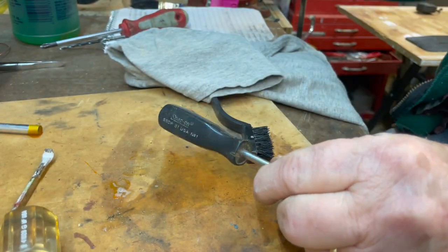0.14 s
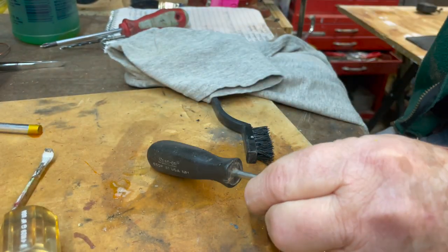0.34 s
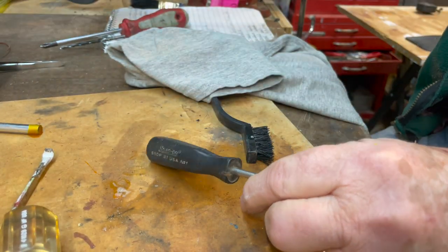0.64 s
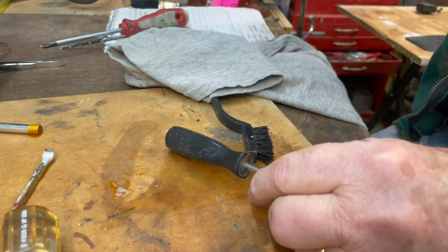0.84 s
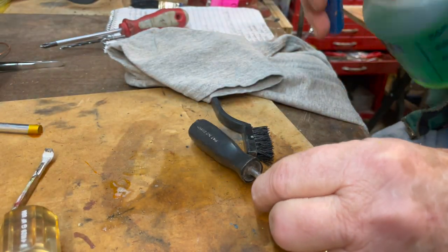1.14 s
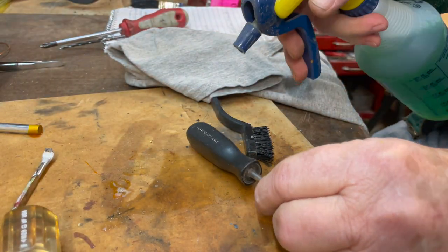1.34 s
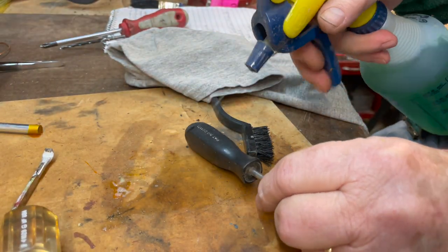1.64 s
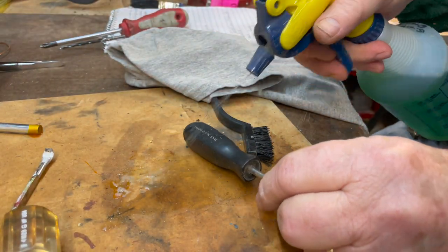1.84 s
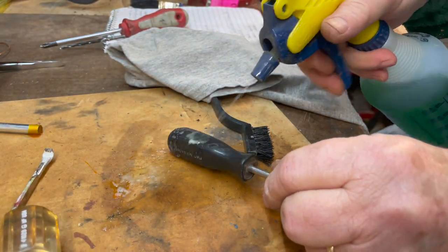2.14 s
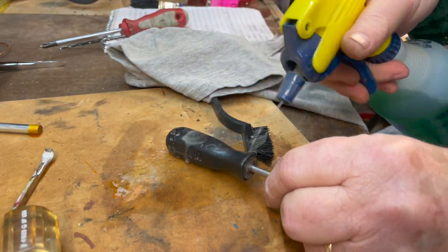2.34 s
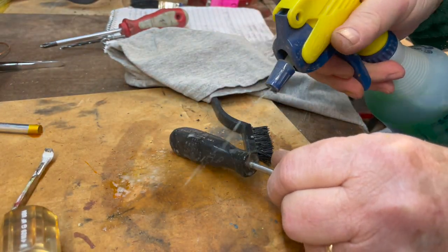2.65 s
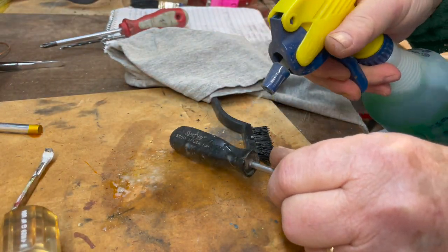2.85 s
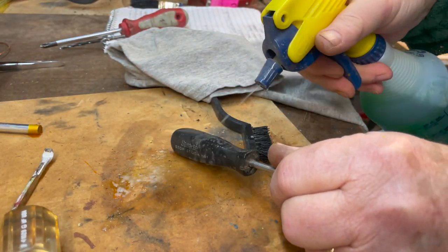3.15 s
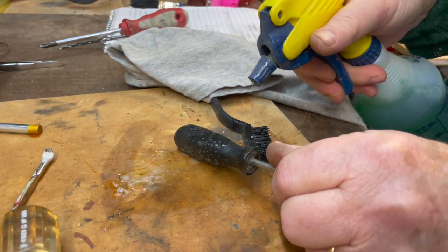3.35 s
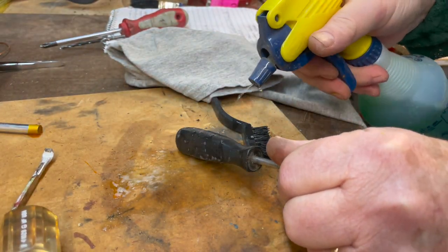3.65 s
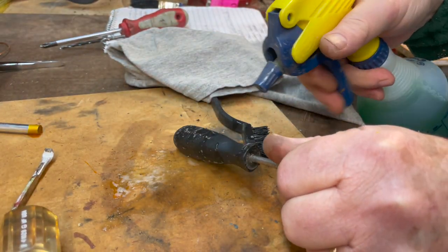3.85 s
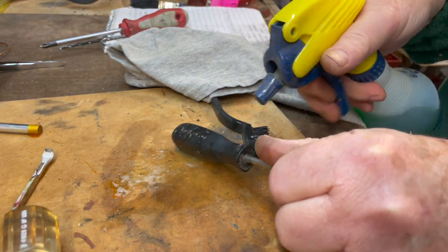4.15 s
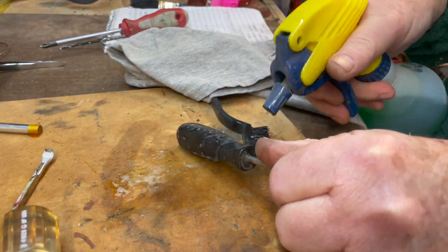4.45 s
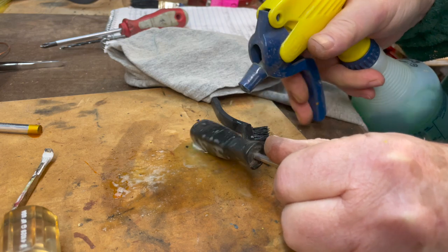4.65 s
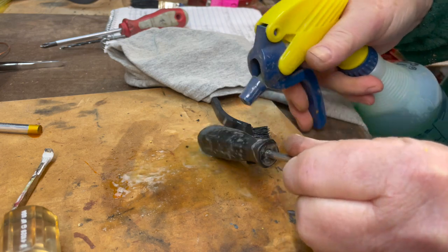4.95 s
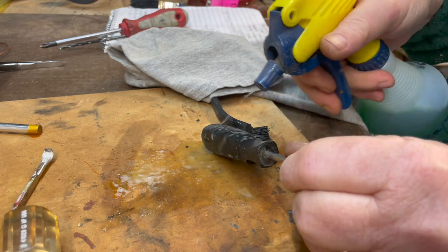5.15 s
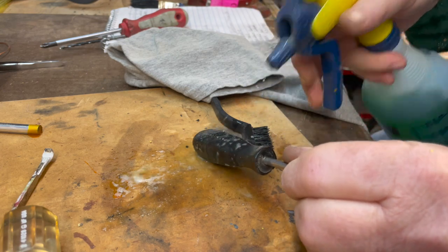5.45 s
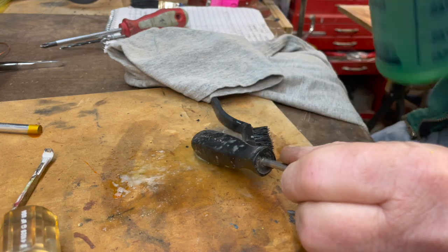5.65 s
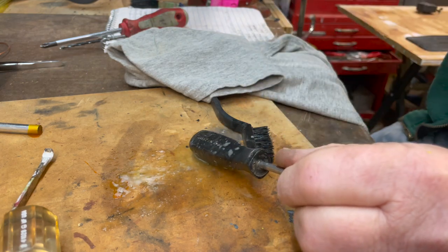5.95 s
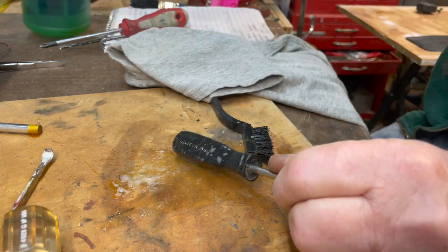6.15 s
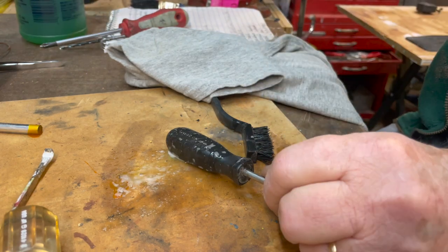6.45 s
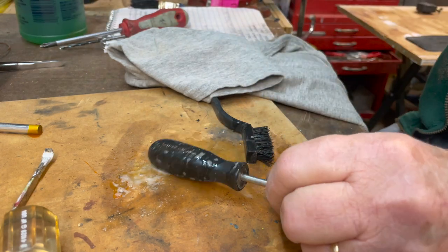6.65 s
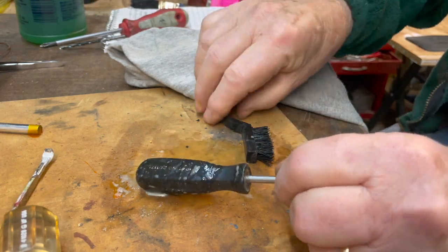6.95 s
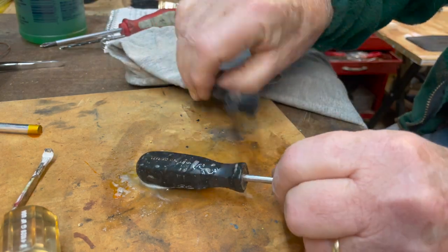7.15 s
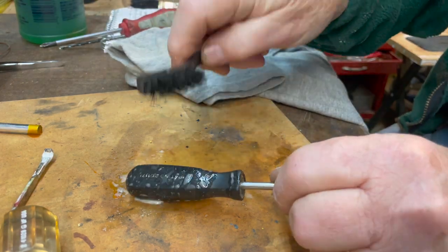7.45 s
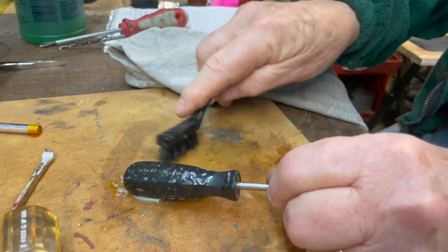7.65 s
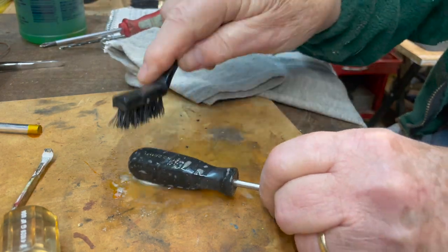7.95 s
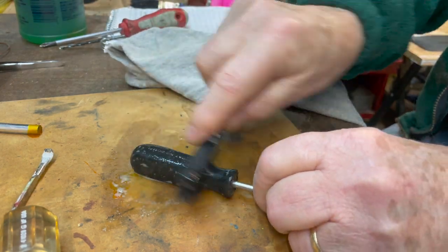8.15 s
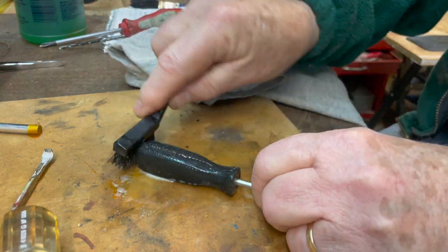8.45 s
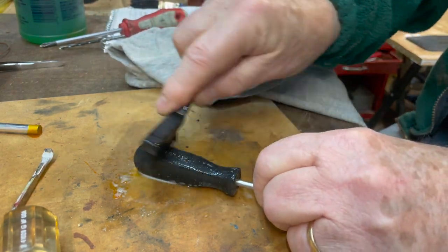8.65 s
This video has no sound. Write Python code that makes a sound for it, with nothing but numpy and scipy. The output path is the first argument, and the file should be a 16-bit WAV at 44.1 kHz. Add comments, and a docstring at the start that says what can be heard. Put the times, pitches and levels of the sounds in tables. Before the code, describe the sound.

Close up in a small workshop with a low fan hum, a tool handle knocks sharply on a wooden board. A plastic sprayer clacks, then gives about sixteen short, fine hissing squirts with light trigger clicks. The bottle is set down with a hollow, rocking thud. Cloth and hands rustle, then a stiff brush scratches the wet handle in quick strokes, with one hard rap. Near stereo phone microphone, short room ring.

```python
"""A trigger bottle sprays close to a phone: shaped noise for the hissing jet, lower noise for the splash.
It is on a workshop bench, where a stiff brush later scrubs a wet tool handle in bursts of grainy noise.
Knocks on the board, the trigger, the bottle set down and brush raps are fading sine waves plus short noise.
Small snaps, scuffs and rustling are noise too. A fan motor hums in steady tones under rushing air.
The small room rings briefly after the hits."""
import sys
import numpy as np
from scipy import signal
from scipy.fft import rfft, irfft
from scipy.io import wavfile

SR = 44100
rng = np.random.default_rng(int(sys.argv[2]) if len(sys.argv) > 2 else 0)


def transcribe(u):
    """Save the signal u as a 16-bit wav file named by the first command-line argument.

    u: samples, shape (n,) or (channels, n), limited to [-1, 1]; the rate is SR.
    q: integer samples, one column per channel.
    """
    v = np.clip(np.atleast_2d(u).T, -1, 1)
    q = np.round(v * 32767).astype(np.int16)
    wavfile.write(sys.argv[1], SR, q)


N = 388521
T = np.arange(N) / SR  # seconds
HZ = np.maximum(np.arange(N // 2 + 1) * SR / N, 1)  # pitch of each spectrum bin

# Fan motor tones: [pitch_hz, rms_level_db]
MOTOR_TONES = [(56.5, -45), (59.6, -64), (85.3, -62.5)]
# Tone colour of the fan's air: [pitch_hz, relative_level_db_per_hz]
AIR_COLOUR = [(25, -17), (45, -12), (60, 3), (75, -0.5), (95, -9), (130, -14.5), (170, -5.5), (240, -11),
              (295, -2), (340, 4.5), (385, -10.5), (480, -8), (700, -14), (1200, -15), (2000, -22),
              (2700, -27), (3280, -27.5), (3600, -31.5), (5500, -41), (8500, -53.5), (13300, -46),
              (15500, -69)]
# Ringing of the small room by pitch: [pitch_hz, t60_s (time to fade by 60 dB), level_db]
ROOM_BANDS = [(215, 0.29, -3), (844, 0.24, -9), (3040, 0.15, -7), (9600, 0.097, -5.5)]
# The phone's two microphone ports: [pitch_hz, likeness_0_to_1, right_leads_rad, left_minus_right_db]
MICROPHONE_PORTS = [(62, 1, 0, 0), (125, 0.8, -.3, 0), (247, 0.8, -0.53, 1.5), (632, 0.64, -1.27, 0.5),
                    (924, 0, -2.5, -0.5), (1170, 0.39, -2, 2.5), (2110, 0.33, -1.5, 1.5),
                    (3260, 0.33, -2, 2), (5010, 0.23, -6, 2.5), (5550, 1, -3, 3), (6630, 0.06, 0, 0.5),
                    (7900, 0, -2.5, 3), (9120, 1, -3, -1), (11300, 0.66, -1.7, 1), (13100, 1, 0, 0)]

# Sleeves and hands moving: [peak_s, rise_s, fall_s, hiss_level_db, rub_level_db]
HAND_RUSTLES = [(0.01, .05, 0.13, -73, -76), (0.225, .03, 0.13, -69, -78), (0.42, 0.16, 0.14, -66, -61.5),
                (0.62, .12, .12, -82, -81), (0.88, 0.16, 0.19, -73, -70.5), (1.02, 0.15, 0.15, -74, -68),
                (1.24, 0.2, 0.13, -67.5, -66.5), (5.89, 0.043, 0.043, -70, -88),
                (6.23, 0.053, 0.1, -58, -55), (6.5, 0.51, 0.48, -68, -69), (6.69, 0.12, 0.065, -64, -54),
                (7.21, 0.17, 0.13, -61, -61.5), (7.36, 0.077, 0.064, -62.5, -55.5),
                (7.51, 0.083, 0.072, -70, -68), (7.96, 0.18, 0.068, -68.5, -66)]
# Colour of the thin rustling hiss: [pitch_hz, level_db]
RUSTLE_HISS_COLOUR = [(8000, -27), (9500, 12), (11000, 11), (13300, 11), (15000, 7.5), (16000, -20)]
# The handle turned softly against the board: [peak_s, rise_s, fall_s, level_db]
HANDLE_NUDGES = [(.785, .015, 0.034, -52), (1.5, .015, .04, -49), (4.7, 0.018, 0.037, -53.5),
                 (7.75, 0.064, 0.043, -50), (2.56, 0.039, .06, -51.5), (2.63, .04, 0.086, -54),
                 (3.215, 0.019, 0.021, -46), (3.45, .02, .03, -51), (4.345, 0.017, 0.017, -50),
                 (4.93, 0.026, .04, -48.5), (5.1, 0.022, 0.047, -50)]
# Dull colour of those scuffs: [pitch_hz, level_db]
DULL_SCUFF_COLOUR = [(300, -32), (450, -3.5), (540, 8.5), (640, -3), (850, -2), (1300, -9), (1800, -13),
                     (2600, -40)]
# Thin bright snaps: [start_s, bright_peak_db, lower_part_relative_db]
BRIGHT_SNAPS = [(0.221, -55, -0.5), (0.763, -35.5, 0), (0.963, -50, 3), (1.477, -13.5, -10),
                (2.2677, -28, -9), (3.736, -42.5, -3), (3.854, -32, -1), (4.138, -24.5, -9.5),
                (4.7143, -27, -6.5), (5.024, -29.5, -7), (5.454, -46.5, -2), (5.474, -37, -18.5),
                (5.5728, -30.5, -19), (6.197, -30.5, 2), (6.6664, -58, -3), (6.9737, -46, 4),
                (7.613, -41.5, 9.5), (7.629, -53, -1), (7.6486, -45, 12)]

# In the tables of blows, levels are before panning; hardness tilts the ring about 1000 Hz.
# Knocks on the board: [start_s, ring_peak_db, crack_level_db, left_minus_right_db, hardness_db_per_octave]
BOARD_KNOCKS = [(0.3218, -5, -30, 4.5, 4.5), (0.364, -23.5, -63, 2, 0), (0.777, -37.5, -87, 8, -4.5),
                (1.013, -17.5, -51, 2, 2), (6.632, -38, -48, 5, -7.5), (6.667, -36, -60, 1, -4),
                (6.699, -38, -48, 2, -4), (7.011, -33, -53, 4, -6), (7.123, -39, -64, 0, -8),
                (7.186, -34, -51, 4, 4), (7.68, -37, -59, 19, 4), (8.649, -40, -68, 7, -12.5)]
# Resonances of the board: [pitch_hz, level_db, t60_s]
BOARD_MODES = [(164, -24.5, 0.035), (300, -26, 0.035), (520.5, 0, 0.13), (610, -7, 0.069),
               (720, -5.5, 0.12), (894, -5.5, 0.065), (1031, 4, 0.053), (1190, 7, 0.072), (1360, 5, 0.04),
               (1544, -1, 0.022), (2140, -18, 0.029), (2310, -14, 0.03), (2900, -10.5, 0.043),
               (3600, -14, 0.025)]
# The bottle set down, rocking on its base: [start_s, ring_peak_db, hardness_db_per_octave]
BOTTLE_THUDS = [(6.193, -18, -2), (6.198, -17, -3), (6.205, -14, -0.5), (6.214, -14, -1), (6.225, -24, -3),
                (6.232, -29, -12), (6.239, -25, 8), (6.246, -23, 0), (6.249, -24.5, 3), (6.255, -21.5, 1),
                (6.262, -23.5, -2), (6.271, -22, -5), (6.284, -35, 2), (6.291, -30, -1), (6.301, -33, -1),
                (6.313, -31.5, -2)]
# Resonances of the bottle: [pitch_hz, level_db, t60_s]
BOTTLE_MODES = [(102, -14.5, 0.12), (163, 0, 0.067), (242, 1, 0.044), (432, 9.5, 0.018), (635, 0, 0.09),
                (893, 6, 0.047), (1020, 1.5, 0.17), (1227, 0.5, 0.21), (1647, -1.5, 0.09),
                (1985, -5, 0.059), (2600, -17, 0.036), (3250, -7, 0.03)]
# The brush back raps the handle: [start_s, ring_peak_db, crack_level_db, left_minus_right_db,
# hardness_db_per_octave]
BRUSH_RAPS = [(8.034, -30, -51.5, 4, -8), (8.042, -31, -58, 7, -11), (8.381, -47, -59, -3, -2),
              (8.4685, -8.5, -32.5, 1.5, 1.5), (8.4755, -23.5, -45, 5, -7)]
# Resonances of the handle: [pitch_hz, level_db, t60_s]
HANDLE_MODES = [(552, -6, 0.057), (770, -5.5, 0.066), (1214, 2, 0.069), (1524, 3.5, 0.037),
                (2100, -4, .022), (2320, 3, 0.02), (2730, -4, 0.019), (3470, -3, 0.022), (4160, -19, 0.017),
                (4850, -6, 0.017)]

# Brush strokes: [peak_s, rise_s, fall_s, bristle_level_db, drag_level_db]
BRUSH_STROKES = [(7.005, 0.043, 0.048, -53, -56), (7.73, 0.093, 0.09, -40.5, -48.5),
                 (8.07, 0.043, 0.063, -46, -55.5), (8.2, 0.065, 0.087, -47, -56.5),
                 (8.3, 0.064, 0.061, -43, -56), (8.42, 0.066, 0.072, -44, -58.5),
                 (8.53, 0.049, 0.067, -42.5, -61), (8.65, 0.076, 0.054, -48.5, -63),
                 (8.75, 0.059, 0.056, -46, -61)]
# Bright colour of the bristle tips: [pitch_hz, level_db]
BRISTLE_COLOUR = [(8000, -17.5), (9500, -4.5), (11000, -6), (12300, -6), (13600, -2.5), (15600, -9.5),
                  (16200, -50)]
# Fuller colour of sliding, for the brush's drag and for rubbing hands: [pitch_hz, level_db]
DRAG_COLOUR = [(300, 9.5), (700, 10), (1500, 3.5), (2500, 0), (3500, -3), (4500, -2), (5500, 2.5),
               (7000, -2), (9000, -14.5), (10500, -36)]
# Low colour of the handle rocking on the board: [pitch_hz, level_db]
ROCKING_COLOUR = [(60, -20), (110, 14), (180, 4), (300, -16), (550, 4), (900, -40), (1500, -50)]
# Tufts of bristles flicking free: [start_s, bright_peak_db]
TUFT_FLICKS = [(8.034, -31), (8.053, -36), (8.0747, -38), (8.096, -33), (8.1834, -33), (8.225, -35),
               (8.2344, -37), (8.2382, -38), (8.2666, -25), (8.309, -30), (8.3215, -39), (8.382, -31),
               (8.4, -35), (8.44, -35), (8.455, -29), (8.505, -28), (8.512, -29), (8.528, -33),
               (8.542, -31), (8.565, -37), (8.574, -37), (8.587, -34), (8.6108, -40), (8.639, -39),
               (8.666, -31.5), (8.681, -34), (8.693, -42), (8.708, -32), (8.728, -32)]

# The trigger meets its stops: [start_s, ring_peak_db, crack_level_db]
TRIGGER_STOPS = [(1.6047, -46, -43.5), (1.7335, -41, -55.5), (1.855, -38.5, -41.5), (2.123, -38, -47.5),
                 (2.2523, -41.5, -53.5), (2.387, -40, -52.5), (2.5296, -39, -53), (2.6596, -38.5, -52.5),
                 (2.9125, -40, -71.5), (3.176, -41, -51.5), (3.4246, -38.5, -68.5), (3.713, -40, -74),
                 (3.975, -43, -51.5), (4.256, -42, -50), (4.3844, -48, -56), (4.547, -43, -45.5),
                 (4.6876, -35.5, -48), (4.861, -36.5, -46.5), (5.1332, -42, -51), (5.3695, -40, -47),
                 (5.475, -37, -40), (5.5727, -43.5, -50.5)]
# Resonances of the trigger lever: [pitch_hz, level_db, t60_s]
LEVER_MODES = [(580, -15, 0.023), (1376, -10, 0.18), (1750, -2.5, .06), (2046, 2.5, 0.13), (2430, -5, .06),
               (2960, -7, 0.1), (4070, -2, 0.048), (4820, -14, 0.017)]
# The plastic housing clacks at the first pull, then ticks faintly: [start_s, ring_peak_db,
# crack_level_db, left_minus_right_db, hardness_db_per_octave]
HOUSING_CLACKS = [(1.4792, -8.5, -30.5, -1, 0.5), (3.365, -50, -60, -2, -2), (3.539, -38, -57, 2, -6),
                  (3.572, -39, -56, -2, -8), (3.597, -45, -53, -2, 0), (3.858, -51, -62, -2, -4),
                  (4.143, -45, -55, -4, -9), (4.268, -45, -56, -2, 5), (4.566, -45, -54, -2, 7)]
# Resonances of the housing: [pitch_hz, level_db, t60_s]
HOUSING_MODES = [(550, -8.5, 0.07), (1103, -3.5, 0.022), (2040, -11, 0.02), (2470, -15, 0.018),
                 (3200, 2, 0.012), (3530, 7.5, 0.012), (3930, 5.5, 0.025), (4900, -6, 0.018),
                 (6000, -4, .012), (6600, -6, 0.012)]
# Squirts, one per pull of the trigger: [peak_s, rise_s, fall_s, jet_level_db, splash_level_db]
SQUIRTS = [(1.61, 0.32, 0.15, -55.5, -68), (1.83, 0.15, 0.19, -46, -69), (2.1, 0.16, 0.21, -51, -65.5),
           (2.33, 0.12, 0.29, -55, -65.5), (2.64, 0.21, 0.2, -56, -63.5), (2.9, 0.21, 0.16, -55, -66.5),
           (3.16, 0.18, 0.15, -55.5, -66.5), (3.41, 0.14, 0.23, -65, -61.5),
           (3.67, 0.2, 0.38, -66.5, -66.5), (3.93, 0.16, 0.37, -62.5, -69), (4.24, 0.17, 0.17, -57, -78),
           (4.5, 0.18, 0.49, -67, -64), (4.88, 0.24, 0.23, -63, -65), (5.11, 0.1, 0.19, -68, -77),
           (5.37, 0.21, 0.19, -66.5, -68), (5.5, 0.087, 0.099, -70, -64)]
# Bright colour of the jet: [pitch_hz, level_db]
JET_COLOUR = [(8000, -15.5), (9500, -4), (11300, -5), (12300, -1.5), (13000, -6), (14000, -5),
              (15600, -12.5), (16200, -36.5)]
# Lower colour of the splash: [pitch_hz, level_db]
SPLASH_COLOUR = [(500, 0), (1200, 18), (2000, -5), (3000, 8), (3300, 10), (3650, 2.5), (5500, 4),
                 (7000, -0.5), (9000, -14), (10500, -32)]
# Full pressure in the stronger squirts: [peak_s, rise_s, fall_s, level_db]
FULL_PRESSURE = [(1.63, 0.046, .045, -62), (1.82, 0.037, 0.04, -45), (2.075, .04, 0.032, -53),
                 (2.35, .05, 0.099, -61), (2.67, .06, 0.044, -57), (2.905, 0.087, 0.063, -50),
                 (3.16, 0.066, 0.069, -54), (4.24, .06, 0.077, -49.5)]
# Extra-bright colour at full pressure: [pitch_hz, level_db]
FULL_PRESSURE_COLOUR = [(10500, -19.5), (12000, -3), (13000, 2), (14200, -2), (15500, -6), (16200, -42)]

GRAIN_TOP_DB = 9  # ceiling on a random jump inside grainy noise
PATHS_ALIKE = 0.66  # share of a blow's random power that both paths have in common
CREST_DB = 9  # peak of a crack over its listed level
PUSH_CYCLES = 0.45  # a resonance needs this much of its cycle to start
BLOW_GAIN, BLOW_FADE_S = 0.8, 0.0055  # extra strength at the start of each ring
BOARD_LAG_CYCLES = 0.79  # bending waves: the bass arrives after the treble
TAP_SCATTER_RAD, UNEVEN_DB = 0.4, 2.5  # randomness of a clean tap: phase, and level of each resonance
SQUIRT_FLAT, STROKE_FLAT, RUSTLE_FLAT = 2.22, 2.9, 1.54  # a higher power holds the top longer


def undb(db):
    """Turn decibels into gain: every 20 dB is a factor of ten."""
    return 10 ** (np.asarray(db) / 20)


def over_hz(table, column):
    """Read one table column at every pitch, evenly by octave."""
    table = np.array(table, float)
    return np.interp(np.log(HZ), np.log(table[:, 0]), table[:, column])


def colour(x, spectrum, lo_hz, hi_hz):
    """Filter a sound to a spectrum and set its rms to 1 between two pitches."""
    bins = rfft(x) * undb(over_hz(spectrum, column=1))
    in_band = (HZ > lo_hz) & (HZ < hi_hz)
    band_energy = np.sum(np.abs(bins[..., in_band]) ** 2, axis=-1)
    power = 2 * np.mean(band_energy) / N ** 2
    return irfft(bins, N) / np.sqrt(power)


def band(x, lo_hz, hi_hz):
    """Keep the pitches between two limits, using only past sound."""
    return signal.sosfilt(signal.butter(2, [lo_hz, hi_hz], "bandpass", fs=SR, output="sos"), x)


def grains(rate_per_s, scatter_db, smear_s):
    """Make noise on two paths whose level jumps at shared random moments and dies away."""
    happens = rng.random(N) < rate_per_s / SR
    jump_db = np.minimum(scatter_db * rng.exponential(size=N), GRAIN_TOP_DB)
    kicks = happens * undb(jump_db)
    swell = signal.lfilter([1], [1, -np.exp(-1 / (smear_s * SR))], kicks)
    return (1 + swell) * rng.standard_normal((2, N))


def swells(events, column, edge_db, flat):
    """Shape gain over time: each event rises and falls, with edge_db of drop after its rise or fall time."""
    power = np.zeros(N)
    for row in events:
        peak_s, rise_s, fall_s = row[:3]
        away = np.abs(T - peak_s) / np.where(T < peak_s, rise_s, fall_s)
        level_db = row[column] + edge_db * np.minimum(away, 4) ** flat
        power += undb(level_db) ** 2
    return np.sqrt(power)


def paired(shape):
    """Draw random values for two paths that mostly agree."""
    shared = rng.standard_normal((1, *shape))
    separate = rng.standard_normal((2, *shape))
    return np.sqrt(PATHS_ALIKE) * shared + np.sqrt(1 - PATHS_ALIKE) * separate


def add(out, start_s, sound):
    """Mix a short sound in at its start time."""
    i = int(start_s * SR)
    out[:, i:i + sound.shape[1]] += sound[:, :N - i]


def crack(lo_hz, hi_hz, t60_s):
    """Make the noise of a sharp contact: a short fading burst with a peak of 1."""
    t = T[:SR // 16]
    burst = band(paired(t.shape) * undb(-60 * t / t60_s), lo_hz, hi_hz)
    return burst / np.abs(burst).max(axis=1, keepdims=True)


def strike(events, modes, spread, scatter_rad, lo_hz, hi_hz, crack_t60_s, uneven_db,
           lag_cycles=0., count=7):
    """Ring clusters of close resonances; random level, pitch and phase make every blow differ."""
    out = np.zeros((2, N))
    now = T[:SR // 11]
    hz, db, t60_s = np.repeat(np.transpose(modes), count, axis=1)[:, :, None]
    t = np.maximum(now - lag_cycles / hz, 0)
    places = np.tile(np.linspace(-1, 1, count), len(modes))[:, None]
    decay = undb(db - 60 * t / t60_s)
    decay *= np.minimum(t * hz / PUSH_CYCLES, 1)
    decay *= 1 + BLOW_GAIN * np.exp(-t / BLOW_FADE_S)  # the blow itself is heard before the ring settles
    for start_s, peak_db, crack_db, pan_db, hard_db in events:
        level_chance, pitch_chance, phase_chance = [paired(hz.shape) for _ in range(3)]
        gain = undb(hard_db * np.log2(hz / 1000) + uneven_db * level_chance)
        pitch_hz = hz * np.exp(spread * (places + pitch_chance / count))
        # small phase scatter gives a clean tap; large scatter gives a clatter
        waves = np.sin(2 * np.pi * pitch_hz * t + scatter_rad * phase_chance)
        ring = (gain * decay * waves).sum(axis=1)
        ring /= np.abs(ring).max(axis=1, keepdims=True)
        side = undb([[pan_db / 2], [-pan_db / 2]])
        add(out, start_s, side * undb(peak_db) * ring)
        add(out, start_s, side * undb(crack_db + CREST_DB) * crack(lo_hz, hi_hz, crack_t60_s))
    return out


def room(x):
    """Walls and shelves return a noise tail that loses its treble first."""
    t, tail = T[:SR // 2], 0
    for hz, t60_s, db in ROOM_BANDS:
        noise = band(rng.standard_normal((2, len(t))), hz / 2, hz * 2)
        part = noise * undb(-60 * t / t60_s) * np.minimum(t / 0.0014, 1)  # starts over 1.4 ms
        energy = np.mean(np.sum(part ** 2, axis=1))
        tail = tail + undb(db) * part / np.sqrt(energy * SR / (3 * hz))
    return x + signal.fftconvolve(x, tail, axes=1)[:, :N]


def fan():
    """A motor gives steady tones; its rushing air is noise that flutters a little."""
    tones = sum(np.sqrt(2) * undb(db) * np.sin(2 * np.pi * hz * T) for hz, db in MOTOR_TONES)
    flutter = grains(rate_per_s=12, scatter_db=1.0, smear_s=0.034)
    rush = flutter + 3 * rng.standard_normal((2, N))
    return tones + undb(-46.5) * colour(rush, AIR_COLOUR, 99, 16000)


def rustle():
    """Cloth and skin slide with a thin hiss and a duller rub under it."""
    rubs = grains(rate_per_s=300, scatter_db=0.96, smear_s=0.011)
    hiss_gain = swells(HAND_RUSTLES, column=3, edge_db=-24, flat=RUSTLE_FLAT)
    hiss = hiss_gain * colour(rubs, RUSTLE_HISS_COLOUR, 9800, 15500)
    rub_gain = swells(HAND_RUSTLES, column=4, edge_db=-17.5, flat=RUSTLE_FLAT)
    return hiss + rub_gain * colour(rubs, DRAG_COLOUR, 2500, 9300)


def nudges():
    """The handle turning against the board makes short grainy scuffs, strongest in the low mid pitches."""
    scuff = grains(rate_per_s=260, scatter_db=2.1, smear_s=0.0037)
    gain = swells(HANDLE_NUDGES, column=3, edge_db=-5, flat=2.1)
    return gain * colour(scuff, DULL_SCUFF_COLOUR, 400, 1500)


def snaps():
    """Tiny cracks are each heard again, with the sides swapped, off a near surface."""
    out = np.zeros((2, N))
    echo_delay_s, echo_db = 0.007, -8.5
    for start_s, peak_db, lower_db in BRIGHT_SNAPS:
        bright = crack(9200, 13200, t60_s=0.0054)
        lower = crack(1460, 9800, t60_s=0.023)
        snap = undb(peak_db) * (bright + undb(lower_db) * lower)
        add(out, start_s, snap)
        add(out, start_s + echo_delay_s, undb(echo_db) * snap[::-1])
    return out


def board_knocks():
    """A tool handle sets the board ringing, with its bass slightly late."""
    return strike(BOARD_KNOCKS, BOARD_MODES, 0.068, TAP_SCATTER_RAD, 1500, 5000, crack_t60_s=0.0071,
                  uneven_db=UNEVEN_DB, lag_cycles=BOARD_LAG_CYCLES, count=9)


def bottle_thuds():
    """The bottle rings as its base rocks; the cracks weaken as it settles."""
    first_s = BOTTLE_THUDS[0][0]
    pan_db = 4.5  # left minus right
    thuds = []
    for start_s, peak_db, hard_db in BOTTLE_THUDS:
        crack_db = peak_db - 18.5 - 120 * (start_s - first_s)  # loses 120 dB per second
        thuds.append((start_s, peak_db, crack_db, pan_db, hard_db))
    return strike(thuds, BOTTLE_MODES, 0.0713, 1.0, 1320, 3900, crack_t60_s=0.045, uneven_db=2.0)


def brush_raps():
    """The back of the brush hits the handle and makes it ring."""
    return strike(BRUSH_RAPS, HANDLE_MODES, 0.067, TAP_SCATTER_RAD, 3100, 5400, crack_t60_s=0.011,
                  uneven_db=UNEVEN_DB, count=9)


def flicks():
    """Single tufts spring back with a very short, bright tick."""
    out = np.zeros((2, N))
    t60_s, middle_db = 0.0033, -10.5
    for start_s, peak_db in TUFT_FLICKS:
        top = crack(12200, 14000, t60_s)
        middle = crack(4200, 8000, 2 * t60_s)
        add(out, start_s, undb(peak_db) * (top + undb(middle_db) * middle))
    return out


def brush():
    """Bristle tips flick free in dense grains; the bundle drags more evenly and rocks the handle."""
    tip_grains = grains(rate_per_s=500, scatter_db=2.8, smear_s=0.0006)
    tip_gain = swells(BRUSH_STROKES, column=3, edge_db=-28.5, flat=STROKE_FLAT)
    tips = tip_gain * colour(tip_grains, BRISTLE_COLOUR, 9800, 15200)
    drag = colour(grains(rate_per_s=500, scatter_db=0.87, smear_s=0.001), DRAG_COLOUR, 3400, 5900)
    rocking = colour(rng.standard_normal((2, N)), ROCKING_COLOUR, 80, 900)
    body_gain = swells(BRUSH_STROKES, column=4, edge_db=-19.5, flat=STROKE_FLAT)
    return tips + body_gain * (drag + undb(-2.5) * rocking)


def trigger_stops():
    """The trigger lever rings with a clatter as it meets its stops."""
    pan_db, hard_db = -2.5, -10.5  # left minus right; hardness per octave
    stops = [(*row, pan_db, hard_db) for row in TRIGGER_STOPS]
    return strike(stops, LEVER_MODES, 0.056, 0.9, 1200, 4300, crack_t60_s=0.068, uneven_db=3.5)


def housing_clacks():
    """The sprayer's plastic housing answers a blow with a short, dense ring."""
    return strike(HOUSING_CLACKS, HOUSING_MODES, 0.062, TAP_SCATTER_RAD, 1800, 4700, crack_t60_s=0.032,
                  uneven_db=UNEVEN_DB, count=12)


def spray():
    """Droplets torn from the nozzle hiss finely; where they land they patter lower."""
    drops = grains(rate_per_s=410, scatter_db=0.36, smear_s=0.0013)
    jet_gain = swells(SQUIRTS, column=3, edge_db=-56, flat=SQUIRT_FLAT)
    jet = jet_gain * colour(drops, JET_COLOUR, 9800, 15500)
    full_drops = grains(rate_per_s=700, scatter_db=1.5, smear_s=0.00089)
    full_gain = swells(FULL_PRESSURE, column=3, edge_db=-22, flat=4.2)
    full_jet = full_gain * colour(full_drops, FULL_PRESSURE_COLOUR, 12200, 15500)
    splash_gain = swells(SQUIRTS, column=4, edge_db=-21.5, flat=SQUIRT_FLAT)
    splash = splash_gain * colour(drops, SPLASH_COLOUR, 2060, 10300)
    return jet + full_jet + splash


def scene():
    """Mix all sources on two paths to the phone; only the hits get the room's tail."""
    hits = snaps() + board_knocks() + bottle_thuds() + brush_raps() + flicks()
    hits += trigger_stops() + housing_clacks()
    return fan() + rustle() + nudges() + room(hits) + brush() + spray()


def record(dry):
    """The ports share part of the sound, shifted in phase; the deepest bass and the top are cut."""
    one, other = rfft(dry)
    alike = np.clip(over_hz(MICROPHONE_PORTS, column=1), 0, 1)
    half_turn = np.exp(.5j * over_hz(MICROPHONE_PORTS, column=2))
    shift = half_turn / undb(over_hz(MICROPHONE_PORTS, column=3) / 2)  # half the difference on each side
    left = one / shift
    right = (alike * one + np.sqrt(1 - alike ** 2) * other) * shift
    ports = irfft(np.array([left, right]), N)
    bass_cut = signal.butter(2, 42, "highpass", fs=SR, output="sos")
    top_cut = signal.ellip(10, .2, 80, 16500, fs=SR, output="sos")
    return signal.sosfilt(top_cut, signal.sosfilt(bass_cut, ports))


dry = scene()
out = record(dry)
transcribe(out)
```